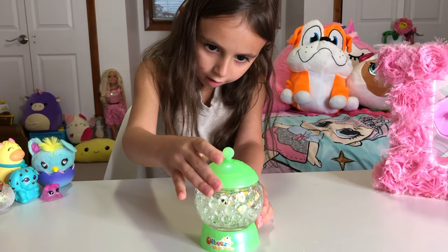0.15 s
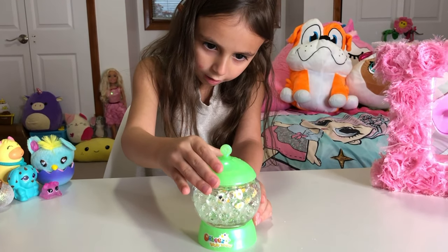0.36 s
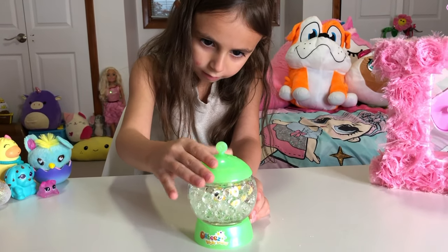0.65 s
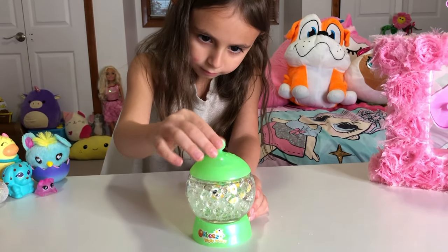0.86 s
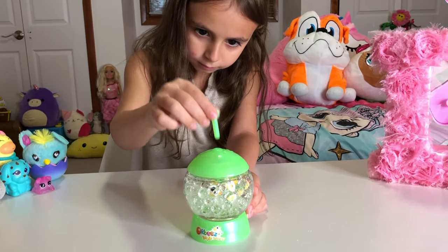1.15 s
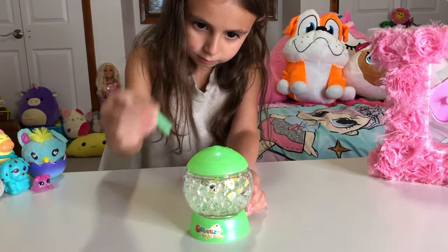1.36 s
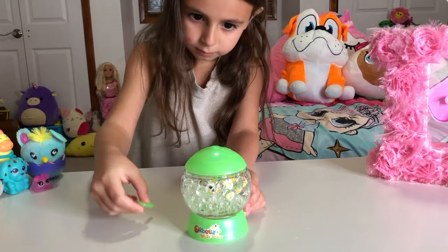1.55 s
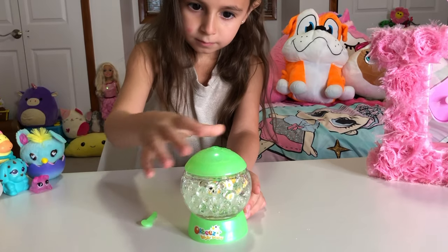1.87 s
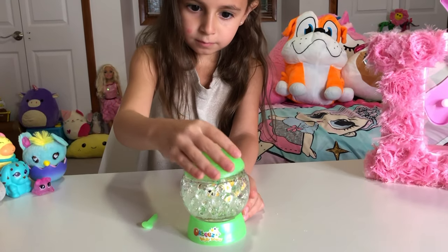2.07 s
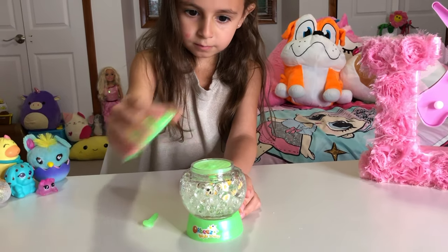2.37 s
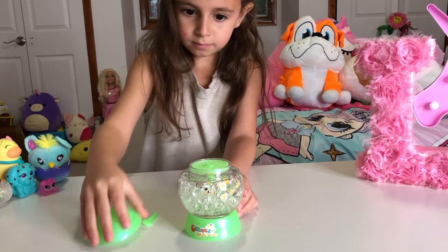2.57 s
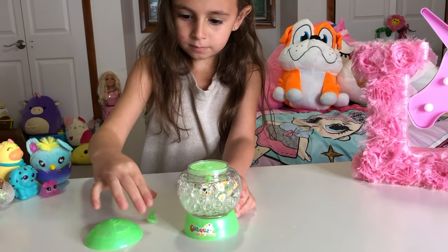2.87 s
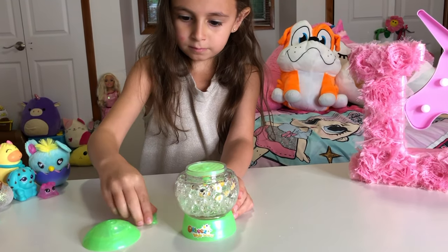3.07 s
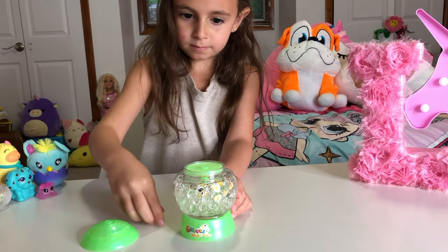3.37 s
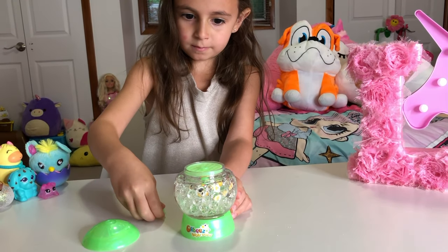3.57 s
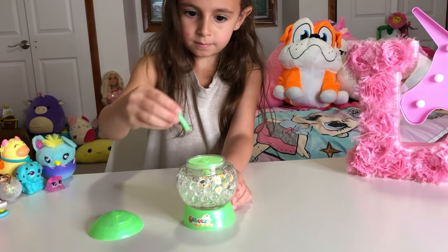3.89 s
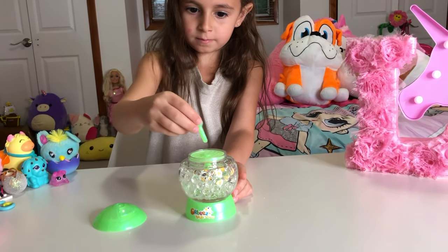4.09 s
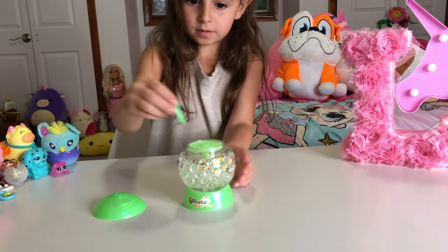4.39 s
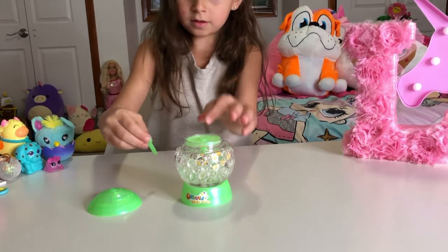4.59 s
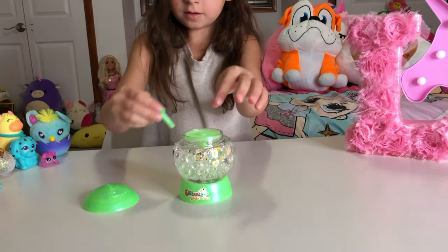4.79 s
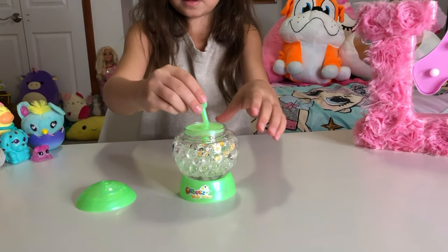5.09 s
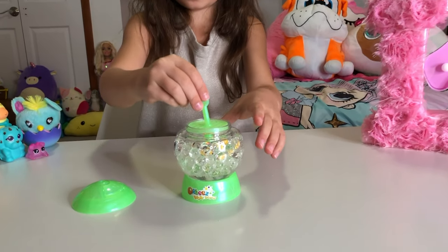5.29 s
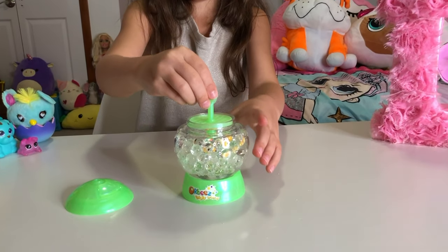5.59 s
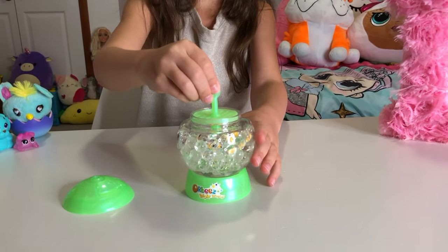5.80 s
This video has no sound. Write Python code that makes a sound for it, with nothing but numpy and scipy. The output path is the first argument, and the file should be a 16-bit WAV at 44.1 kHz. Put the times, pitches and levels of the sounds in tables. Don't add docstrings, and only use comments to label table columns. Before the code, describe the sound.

A quiet bedroom, close microphone: deep, slightly swelling house rumble around 66 Hz, with faint steady hiss. After soft touches from 0.55 s, a sharp hollow plastic knock hits at 0.69 s, followed by a second at 0.73 s, then a muffled bump at 0.9 s and a faint scrape near 1.0 s. At 1.65-1.85 s a light plastic pick drops and rattles in tiny bright bounces that die away. From 2.0 s a lid is gripped, its rim giving way at 2.09 s and snapping free at 2.12 s. The loudest event comes at 2.62 s: the domed lid clacks onto the table, rocks back at 2.75 s and chatters ever faster, stopping by 2.92 s. Faint release touches follow at 3.05 s. Soft finger scuffs occur around 3.4-3.7 and 4.4-4.5 s. Small dull pokes come at 5.1-5.56 s, with one clearer click at 5.25 s. Reflections are short.

```python
import sys
import numpy as np
from scipy import signal
from scipy.fft import rfft, irfft, next_fast_len
from scipy.io import wavfile

SR = 44100
rng = np.random.default_rng(int(sys.argv[2]) if len(sys.argv) > 2 else 0)


def attenuation_scalar(level_db):
    decades = np.asarray(level_db, float) / 20
    return 10 ** decades


def dump_mix(stems):
    frames = np.atleast_2d(stems).T
    limited = np.clip(frames, -1, 1)
    pcm = np.round(limited * 32767).astype(np.int16)
    wavfile.write(sys.argv[1], SR, pcm)


N = 262350

# t/s, body peak level/dB, click peak level/dB, crackle/ms
LID_LANDINGS = [(2.6207, -12.5, -16, 1.7), (2.6275, -21.5, -21, 1.4), (2.725, -47.5, -45.5, 2.1),
                (2.7515, -21.5, -25.5, 2.5), (2.754, -14.5, -20, 2.4), (2.796, -19.5, -28, 3.2),
                (2.831, -22, -34.5, 5.6), (2.835, -25.5, -34.5, 4.1), (2.849, -29, -39, 1.1),
                (2.864, -25, -40, 1.7), (2.869, -19.5, -27, 1.1), (2.884, -23.5, -33, 1.8),
                (2.891, -20, -27.5, 0.8), (2.9025, -19, -30, 2.7), (2.91, -30, -39, 1.1),
                (2.914, -44, -44, 2.5), (2.922, -37, -45, 1.4)]
RIM_ROCKS = [
    2.752,
    2.795,
    2.835,
    2.867,
]
# t/s, body, thud and click peak level/dB, crackle/ms
LID_SETTLES = [
    (3.036, -47, -35.5, -47.5, 3.5),
    (3.05, -49.5, -45.5, -42, 1.3),
    (3.071, -44.5, -41.5, -49, 0.94),
]
# t/s, body, thud and click peak level/dB, crackle/ms
JAR_KNOCKS = [
    (0.558, -52.5, -44, -70, 2),
    (0.634, -63, -40, -55, 6.5),
    (0.677, -62, -41, -56, 0.83),
    (0.691, -23.5, -22.5, -13.5, 0.49),
    (0.705, -33.5, -48, -47, 1),
    (0.7285, -29, -23, -22.5, 1.5),
    (0.737, -37, -52, -47, 3.9),
    (0.894, -47.5, -36.5, -53, 3.1),
    (1.005, -54.5, -53, -53, 22),
    (1.03, -66, -75, -59, 14),
]
# t/s, body, thud and click peak level/dB, crackle/ms
UNSNAPS = [
    (1.996, -73, -40, -64, 1.3),
    (2.008, -53, -38, -63, 4.6),
    (2.037, -51, -38.5, -48, 1),
    (2.09, -31.5, -25, -43, 1.4),
    (2.097, -28.5, -32, -30, 2.3),
    (2.102, -42, -24.5, -41, 4.3),
    (2.1205, -23.5, -29.5, -19, 1.25),
]
# t/s, body peak level/dB, click peak level/dB
PICK_BOUNCES = [(1.647, -38, -35.5), (1.654, -43, -45), (1.659, -40, -41), (1.7049, -31, -25),
                (1.7313, -35.5, -20.5), (1.7403, -34, -29), (1.748, -37, -46), (1.767, -36.5, -38),
                (1.778, -39.5, -38), (1.787, -38, -45), (1.8026, -37.5, -41.5), (1.825, -44, -59),
                (1.85, -50, -64), (1.947, -61, -57)]
# t/s, body, thud and click peak level/dB, crackle/ms
POKES = [
    (5.102, -51, -46, -53, 2.3),
    (5.117, -69.5, -47.5, -60, 1.7),
    (5.25, -43, -41.5, -28, 1.54),
    (5.267, -51, -45.5, -64, 4.3),
    (5.287, -56, -67, -66, 2.6),
    (5.36, -73, -52.5, -65, 3),
    (5.522, -80, -44.5, -66, 9.5),
    (5.558, -42, -36.5, -44.5, 1.65),
]
# t/s, body, thud and click peak level/dB, crackle/ms
SCUFFS = [(3.412, -52, -70, -51, 4.1), (3.48, -57.5, -52, -74, 31), (3.52, -52, -54, -67, 20),
          (3.55, -64, -67, -61, 23), (3.673, -54, -74, -49.5, 6.6), (3.679, -49.5, -72, -48, 4.9),
          (3.69, -45, -76, -55, 5.5), (4.375, -65, -52, -63, 3.5), (4.43, -58, -64, -60, 14),
          (4.52, -50.5, -52.5, -52.5, 3.9), (5.339, -56, -70, -56, 3)]

# f/Hz, width/Hz, level/dB
LID_MODES = [(368.5, 37, -5), (520, 121, -2.5), (1000, 43, -4.5), (1215, 53, 3.5), (1385, 98, 6),
             (1570, 114, 1.5), (2130, 270, -60.5), (2280, 340, -21), (3990, 490, 5.5), (4500, 320, -3.5),
             (6240, 1200, -3), (8000, 880, -7.5), (9700, 3000, -12)]
CLOSED_JAR_MODES = [(183, 26, -2.5), (370, 93, -8.5), (580, 180, -6), (790, 130, -2.5), (1190, 69, -18),
                    (1473, 62, -9), (3426, 460, -10), (3750, 310, -12), (4240, 320, -24), (5800, 460, -19),
                    (8100, 650, -29), (12400, 1000, -17)]
OPEN_JAR_MODES = [(349, 58, -4), (537, 290, -18.5), (760, 110, -4), (867, 190, -1), (1470, 99, -6),
                  (1590, 69, -35), (2650, 410, -9.5), (3650, 380, -15.5), (4630, 300, -34),
                  (5700, 440, -41), (8540, 710, -18), (11900, 970, -28)]
PICK_MODES = [(640, 60, 2), (1580, 130, -11), (3900, 690, 4), (5800, 630, -8), (9800, 1700, -1)]
POKED_JAR_MODES = [(195, 31, 8), (383, 27, -26), (982, 75, -8), (1130, 95, -15), (2280, 170, -30),
                   (2820, 1400, -19.5), (3250, 880, -21), (4030, 380, -24), (8900, 960, -22)]
FINGER_MODES = [(340, 180, -14), (700, 230, 9), (1035, 300, -4), (1590, 410, 0), (2130, 320, -4),
                (2500, 430, 7), (3550, 380, 1)]
TABLE_MODES = [(245, 33, 1)]

CRACKLE_HASTE = (1, 0.96, 0.99)
CRACKLE_SHARE = (0.3, 0.21, 0.55)

# f/Hz, T60/s
ROOM_T60 = [(250, 0.5), (1000, 0.34), (4000, 0.34), (12000, 0.3)]
# t/s, level/dB
ROOM_MODE_LEVEL = [(0.0, -51), (2.17, -57), (2.18, -43.5), (2.55, -76), (2.6, -49.5), (3.24, -47),
                   (3.29, -73.5), (3.36, -50), (4.22, -60), (4.37, -48), (4.42, -51), (4.65, -38.5),
                   (4.78, -64.5), (4.85, -48), (5.18, -67), (5.49, -48), (5.54, -64), (5.94, -51.5)]
# f/Hz, level/dB per Hz
RUMBLE_SPECTRUM = [(40, -11.5), (52, -15.5), (64, -2), (76, -8.5), (88, -11), (104, -13.5), (122, -11.5),
                   (135, -30.5)]
SWAY_SPECTRUM = [(.5, -24), (1.5, -9), (3.5, 0), (5.5, -11), (12, -16), (18, -20), (21, -33), (44, -38)]
HISS_SPECTRUM = [(76, -32.5), (156, -2), (194, -10.5), (263, -3), (511, -12), (765, -17), (5960, -19.5),
                 (16000, -23)]

TABLE_HZ, TABLE_WIDTH_HZ = 245, 12
SCATTER_DB = 2.5
DETUNE = 0.015
LOSS = 0.085
CONTACT = 4096


def rms_one(x):
    return x / np.sqrt(np.mean(x ** 2) + 1e-20)


def at_hz(points, hz):
    table_hz, value = np.transpose(points)
    return np.interp(np.log(hz), np.log(table_hz), value)


def band(x, low_hz, high_hz):
    return signal.sosfilt(signal.butter(2, [low_hz, high_hz], "band", fs=SR, output="sos"), x)


def resonate(x, hz, width_hz):
    r = np.exp(-np.pi * width_hz / SR)
    top = np.array([1, 0, -1]) * (1 - r * r) / 2
    return signal.lfilter(top, [1, -2 * r * np.cos(2 * np.pi * hz / SR), r * r], x)


def coloured(spectrum):
    size = next_fast_len(N)
    hz = np.maximum(np.fft.rfftfreq(size, 1 / SR), 0.1)
    inside = (hz >= spectrum[0][0]) & (hz <= spectrum[-1][0])
    shape = attenuation_scalar(at_hz(spectrum, hz)) * inside
    return rms_one(irfft(rfft(rng.standard_normal(size)) * shape, size)[:N])


def contact_force(crackle_s, reach_hz):
    age = np.arange(CONTACT) / SR / max(crackle_s, 1e-4)
    noise = rng.standard_normal(CONTACT)
    crackle = noise * np.abs(noise) * (1 - np.exp(-3 * age))
    tick = np.zeros(CONTACT)
    tick[0] = min(1, (0.0012 / crackle_s) ** 2)
    soften = signal.butter(3, np.clip(reach_hz, 2000, 18000), fs=SR, output="sos")
    tick, crackle = signal.sosfilt(soften, [tick, crackle])
    return age, tick, crackle


def strikes(hits, modes, table_db, broad_db, thud_db, click_db, click_from_hz, hard_hz, harder=0.0052):
    out = np.zeros(N + CONTACT)
    modes = modes + [(hz, width, db + table_db) for hz, width, db in TABLE_MODES]
    edges = [170, 600, click_from_hz, 17000]
    for s, body, thud, click, crackle_ms in hits:
        reach_hz = hard_hz * (1 + harder * (click + 40))
        age, tick, crackle = contact_force(crackle_ms / 1000, reach_hz)
        scatter = attenuation_scalar(SCATTER_DB * rng.standard_normal(len(modes)))
        shift = 1 + DETUNE * rng.standard_normal(len(modes))
        peaks_db = [thud + thud_db, body, click + click_db]
        at = round(s * SR)
        for low, high, peak_db, fill_db, haste, share in zip(
                edges, edges[1:], peaks_db, broad_db, CRACKLE_HASTE, CRACKLE_SHARE):
            force = tick + share * crackle * np.exp(-age * haste)
            group = [(k, mode) for k, mode in enumerate(modes) if low <= mode[0] < high]
            top_db = max([mode[2] for k, mode in group], default=0)
            sound = attenuation_scalar(fill_db) * force
            for k, (hz, width, db) in group:
                pitch = hz if hz == TABLE_HZ else hz * shift[k]
                ring = resonate(force, pitch, max(width, LOSS * hz))
                sound = sound + attenuation_scalar(db - top_db) * scatter[k] * ring
            sound = band(band(sound, low, high), 0.8 * low, 1.2 * high)
            out[at:at + CONTACT] += attenuation_scalar(peak_db) * sound / np.abs(sound).max()
    return out[:N]


def hollow(x, dip_hz):
    return x - resonate(x, dip_hz, 0.22 * dip_hz)


def lid_contacts():
    rows = list(LID_LANDINGS)
    for s in RIM_ROCKS:
        for k in range(3):
            gaps = k + 1 + 0.326 * rng.uniform(-1.1, 1)
            db = -38 + 3 * k
            rows.append((s + 0.011 * gaps, db, db - 25, 4.4))
    return [(s, body, -17.5 + 0.78 * body, click, ms) for s, body, click, ms in rows]


def lid():
    rocking = strikes(lid_contacts(), LID_MODES, table_db=-12, broad_db=(-10, -17, -11), thud_db=2.0,
                      click_db=0.0, click_from_hz=2670, hard_hz=9400, harder=0.018)
    settling = strikes(LID_SETTLES, POKED_JAR_MODES, table_db=9.0, broad_db=(-22, -24, -3), thud_db=-1.5,
                       click_db=0.0, click_from_hz=2300, hard_hz=10700)
    return rocking + settling


def knocked_jar():
    knocks = strikes(JAR_KNOCKS, CLOSED_JAR_MODES, table_db=9.0, broad_db=(-16, -26, -14), thud_db=-3.0,
                     click_db=-2.0, click_from_hz=3420, hard_hz=6900)
    return hollow(knocks, dip_hz=2260)


def unsnapping_lid():
    snaps = strikes(UNSNAPS, OPEN_JAR_MODES, table_db=-9, broad_db=(-16, -26, -14), thud_db=-0.5,
                    click_db=-0.5, click_from_hz=1940, hard_hz=6700)
    return hollow(snaps, dip_hz=1980)


def dropped_pick():
    bounces = [(s, body, body - 9, click, 0.86) for s, body, click in PICK_BOUNCES]
    return strikes(bounces, PICK_MODES, table_db=-6, broad_db=(-6, -3, -3), thud_db=-4.0,
                   click_db=-0.8, click_from_hz=2400, hard_hz=4450, harder=0.09)


def poked_jar():
    pokes = strikes(POKES, POKED_JAR_MODES, table_db=2.0, broad_db=(-22, -24, -15), thud_db=2.5,
                    click_db=-2.5, click_from_hz=2500, hard_hz=5560, harder=0.0027)
    return hollow(pokes, dip_hz=1700)


def finger_scuffs():
    return strikes(SCUFFS, FINGER_MODES, table_db=-2, broad_db=(-15, -18, -15), thud_db=1.0,
                   click_db=1.5, click_from_hz=2180, hard_hz=7000)


def table_top(knocks):
    stir = rms_one(resonate(rng.standard_normal(N), TABLE_HZ, TABLE_WIDTH_HZ))
    return attenuation_scalar(-72.5) * stir + attenuation_scalar(-1.5) * resonate(knocks, TABLE_HZ, TABLE_WIDTH_HZ)


def room(x, echo_s, echo_db, start_s, tail_db):
    t = np.arange(SR // 2) / SR
    tail = np.zeros(len(t))
    for low in 110 * 2.0 ** np.arange(8):
        octave = band(rng.standard_normal(len(t)), low, 2 * min(low, 8000))
        tail += octave * attenuation_scalar(-60 * t / at_hz(ROOM_T60, 2.7 * low))
    tail *= np.clip(t / start_s - 0.5, 0, 1)
    tail *= attenuation_scalar(tail_db) / np.sqrt(np.sum(tail ** 2))
    tail[round(echo_s * SR)] += attenuation_scalar(echo_db)
    return signal.fftconvolve(x, tail)[:N]


def house():
    s, level_db = np.transpose(ROOM_MODE_LEVEL)
    mode = rng.standard_normal(N + SR)
    for _ in range(2):
        mode = resonate(mode, 66.2, 11)
    mode = mode[SR:]
    size = np.abs(signal.hilbert(mode, next_fast_len(N))[:N])
    even = rms_one(mode / (size + size.mean()))
    swell = attenuation_scalar(np.interp(np.arange(N) / SR, s, level_db) - 1.5)
    return swell * even + attenuation_scalar(-55.5) * coloured(RUMBLE_SPECTRUM)


def air_sway():
    return attenuation_scalar(-31.6) * coloured(SWAY_SPECTRUM)


def microphone_hiss():
    return attenuation_scalar(-62) * coloured(HISS_SPECTRUM)


def scene():
    landing, pick = lid(), dropped_pick()
    jar, unsnap = knocked_jar(), unsnapping_lid()
    pokes, scuffs = poked_jar(), finger_scuffs()
    direct = landing + jar + unsnap + pick + pokes + scuffs
    spread = landing + pick + attenuation_scalar(-3.5) * (jar + unsnap) + attenuation_scalar(-4.5) * (scuffs + pokes)
    wet = room(spread, echo_s=0.003, echo_db=-16.5, start_s=0.0038, tail_db=-9.0)
    table = table_top(attenuation_scalar(-6.5) * landing + attenuation_scalar(-13.0) * jar + pokes)
    floor = house() + air_sway() + microphone_hiss()
    return (direct + wet + table + floor)[None]


def top_cut(x):
    return signal.sosfilt(signal.butter(12, 16480, fs=SR, output="sos"), x)


def record(dry):
    steep = signal.cheby2(10, 40, 16300, fs=SR, output="sos")
    finished = signal.sosfilt(steep, dry)
    return top_cut(finished)


dry = scene()
out = record(dry)
dump_mix(out)
```